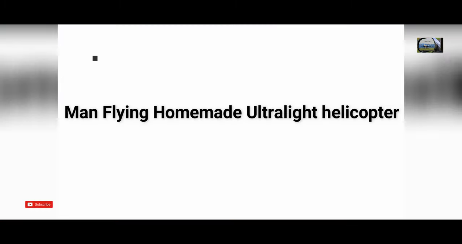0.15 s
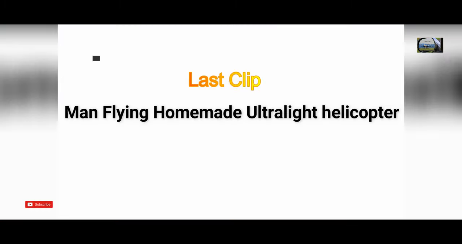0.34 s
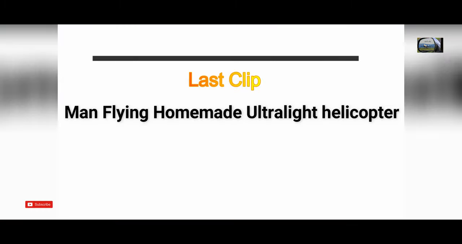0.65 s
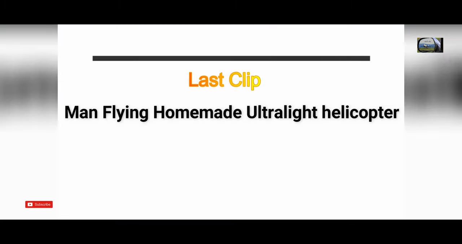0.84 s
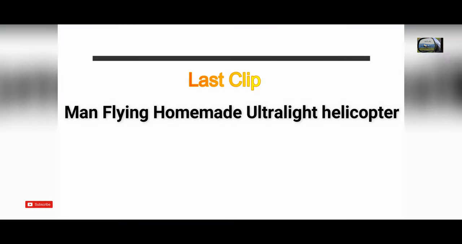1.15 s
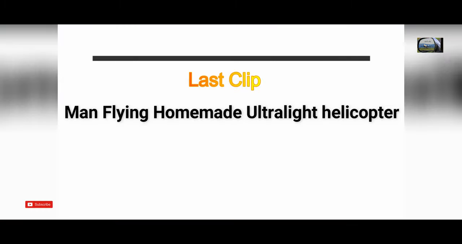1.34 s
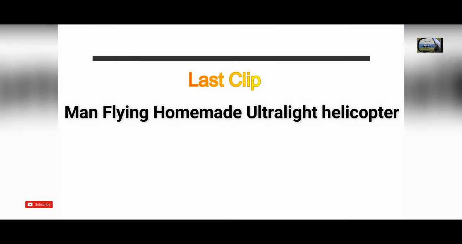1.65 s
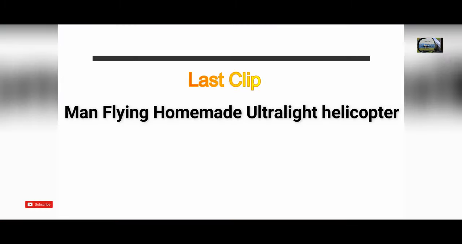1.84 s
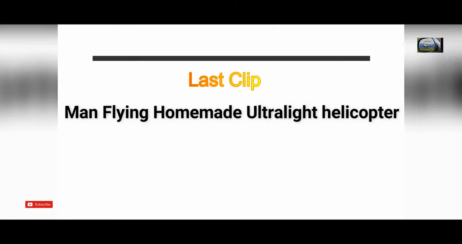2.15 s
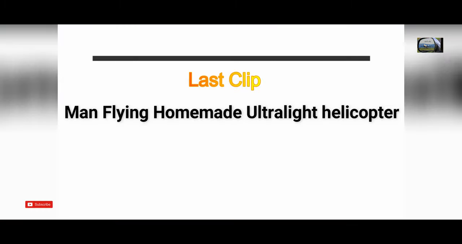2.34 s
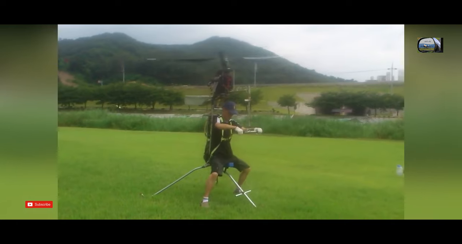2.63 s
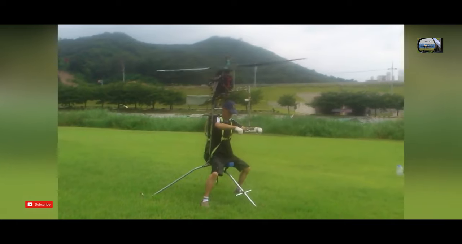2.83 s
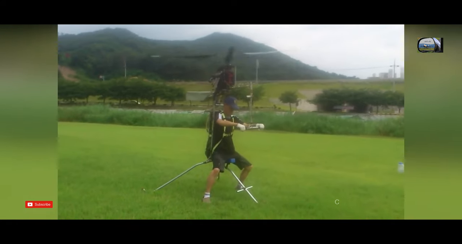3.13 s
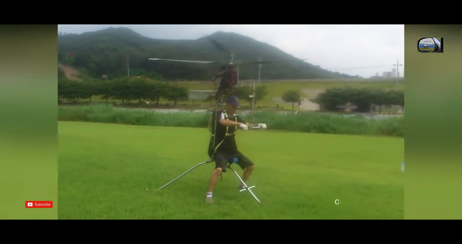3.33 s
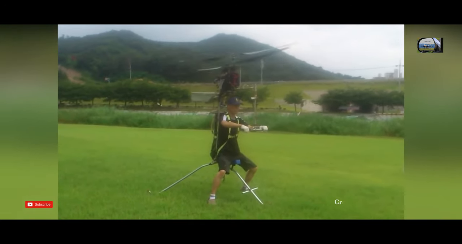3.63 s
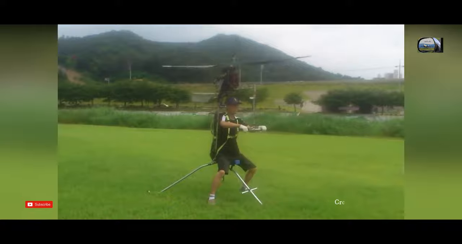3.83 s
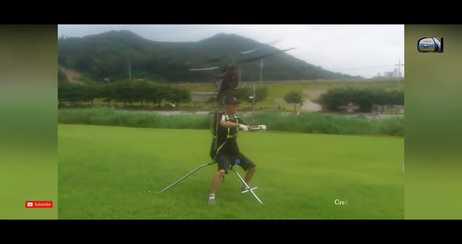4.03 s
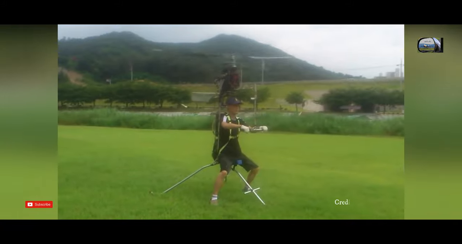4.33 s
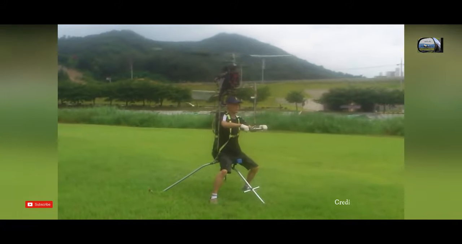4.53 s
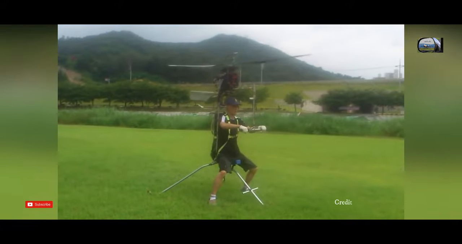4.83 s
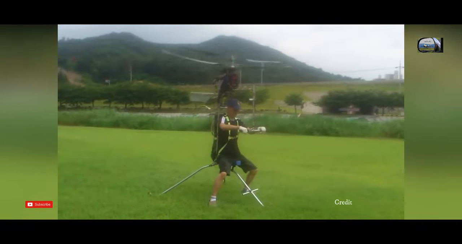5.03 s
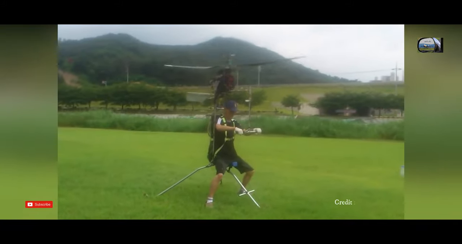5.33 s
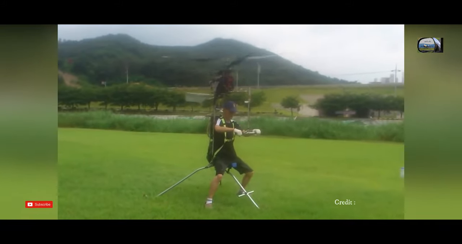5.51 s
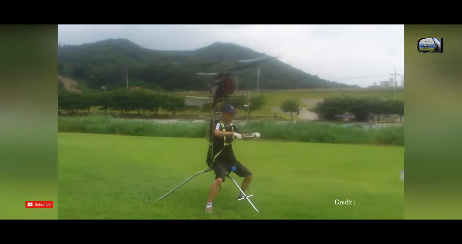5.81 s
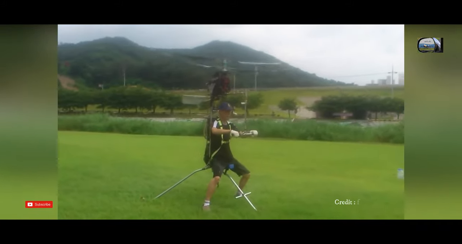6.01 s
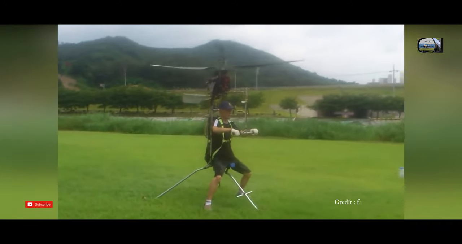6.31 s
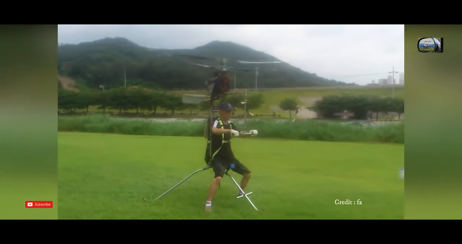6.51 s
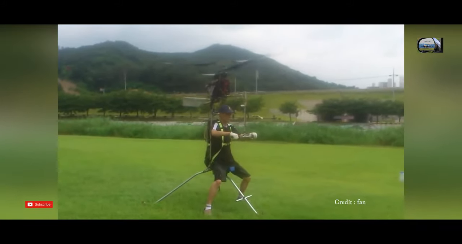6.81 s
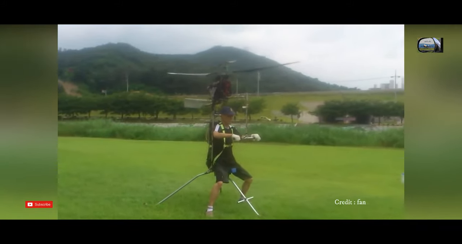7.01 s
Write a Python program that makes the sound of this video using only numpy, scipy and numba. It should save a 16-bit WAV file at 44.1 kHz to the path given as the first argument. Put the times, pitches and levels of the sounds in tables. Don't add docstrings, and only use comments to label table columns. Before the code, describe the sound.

Silence lasts about 0.17 seconds, then a small two-cylinder two-stroke engine enters abruptly. Until about 3.2 it idles at a loping, irregular pace: paired pops roughly seven times a second from each cylinder, weak misfires between, dry crackling gas and hollow, metallic exhaust ringing. From 3.2 to 3.5 the pops crowd together and it catches with a small thump. It then fires in a nearly even, raspy buzz at about 85 beats per second, with slight stumbles until 4.9, climbing gradually to about 120 by 7.1. Fan and blade hiss rises quickly after 3.2, then slowly thickens. Rotor wash adds low fluttering rumble, with stronger gusts and blunt microphone thumps near 6.3-6.4 and a fainter one at 6.65. Close, outdoor phone stereo; short dull grass echo, right-side treble shaded, image drifting from slightly left to centre.

```python
import sys
import numpy as np
from scipy import signal
from scipy.fft import rfft, irfft
from scipy.io import wavfile
from scipy.ndimage import uniform_filter1d, map_coordinates
from numba import njit

SR = 44100
rng = np.random.default_rng(int(sys.argv[2]) if len(sys.argv) > 2 else 0)


def persist_wave(psi):
    counts = np.round(np.clip(psi, -1, 1) * 32767).astype(np.int16)
    wavfile.write(sys.argv[1], SR, np.atleast_2d(counts).T)


def nominal_scale(level):
    x = np.asarray(level, float) / 20
    return 10 ** x


N = 315756
T = np.arange(N) / SR
F = np.maximum(np.arange(N // 2 + 1) * SR / N, 1)

# (time [s], speed [Hz])
IDLE_SHAFT = [(0, 35.1), (3.2, 35.3), (3.45, 42)]
# (time [s], speed [Hz])
POWER_SHAFT = [(3.45, 42.2), (3.53, 45.09), (3.575, 44.38), (3.655, 46.69), (3.835, 48.55), (3.875, 47.99),
               (4.085, 48.71), (4.275, 48.62), (4.39, 49.41), (4.855, 51.48), (5.155, 52.41),
               (5.245, 51.95), (5.38, 53.53), (5.865, 55.51), (6.03, 56.41), (6.445, 58.14), (6.675, 59.34),
               (7.16, 60.34)]
# (time [s], blow [dB], blow one turn earlier [dB], gas crack [dB])
LOPES_CRISP = [(0.25, -16, -16, -38), (0.391, -15.5, -19.5, -22), (0.535, -16, -15.5, -25),
               (.676, -14.5, -20, -22), (.791, -18, -27, -33), (0.876, -19.5, -20, -36),
               (.989, -16.5, -23, -25.5), (1.13, -18, -14.5, -37), (1.274, -16.5, -17, -28),
               (1.417, -14.5, -19, -21.5), (1.59, -18, -15, -27), (1.731, -15, -17.5, -28),
               (1.875, -15, -17.5, -25), (2.019, -18, -16.5, -39), (2.16, -16.5, -26, -32),
               (2.246, -16, -27, -24), (2.389, -15.5, -21, -39), (2.53, -14.5, -17.5, -26),
               (2.674, -15, -19.5, -21.5), (2.817, -14.5, -19, -28), (2.959, -13.5, -19.5, -20.5),
               (3.128, -17, -15.5, -32), (3.27, -15.5, -13, -22), (3.348, -11.5, -26, -24),
               (3.400, -14, -16, -46), (3.449, -11.5, -16, -32), (3.496, -13.5, -12.5, -29)]
# (time [s], blow [dB], blow one turn earlier [dB], gas crack [dB])
LOPES_ROUGH = [(0.234, -14, -22, -21), (.348, -15.5, -24, -23.5), (0.49, -23, -17.5, -25),
               (0.635, -24, -17, -48), (0.772, -19, -21, -24), (0.888, -17.5, -22.5, -26),
               (1.029, -16, -18.5, -23), (1.173, -15.5, -20, -26.5), (1.317, -19, -19, -26),
               (1.455, -17, -16, -26.5), (1.599, -16, -25, -26), (1.688, -17, -26, -23),
               (1.832, -18, -21.5, -23), (1.972, -18, -18, -23), (2.1165, -14, -18, -20.5),
               (2.23, -20, -28, -22.5), (2.259, -16, -22, -23), (2.373, -15, -25, -26),
               (2.403, -18, -21, -26), (2.513, -22, -27, -21.5), (2.544, -14.5, -40, -27),
               (2.688, -14, -20, -29), (2.802, -18, -23.5, -21), (2.915, -16.5, -17.5, -24.5),
               (3.056, -14.5, -20.5, -20), (3.17, -17, -30, -29), (3.198, -16, -23, -24),
               (3.333, -21, -14, -22), (3.411, -12, -45, -23), (3.434, -16, -11, -32),
               (3.483, -13, -44, -24)]
# (time [s], blow [dB])
STRAYS = [(.278, -19), (.705, -21), (.819, -23), (.931, -21.5), (1.187, -29), (1.529, -25), (1.82, -27),
          (1.962, -22), (2.047, -27), (2.075, -22), (2.104, -23), (2.303, -37), (2.331, -20.5),
          (2.416, -23), (2.473, -25), (3.073, -22)]
# (time [s], loss [dB])
STUMBLES = [
    (3.575, 20),
    (3.824, 5),
    (3.998, 3),
    (4.018, 4),
    (4.11, 6),
    (4.4, 4),
    (4.79, 5),
    (4.897, 4),
]

# (frequency [Hz], width [Hz], level [dB], signed gain [1])
PIPE_CRISP = [(390, 34, -38, -1.8), (550.4, 85, 0, -1.1), (936, 656, 9.5, -0.88), (1302, 214, 10, 0.38)]
# (frequency [Hz], width [Hz], level [dB], signed gain [1])
PIPE_CRISP_TAIL = [(560.3, 47, -9, -0.7), (357, 21, -17.5, -1)]
# (frequency [Hz], width [Hz], level [dB], signed gain [1])
PIPE_ROUGH = [(287, 195, 3.5, -0.59), (603.6, 131, -2.5, -1.7), (1108, 48, -1.5, -0.38),
              (1642, 280, 7.5, 0.23)]
# (frequency [Hz], width [Hz], level [dB], signed gain [1])
PIPE_ROUGH_COLD = [(325, 43, 4.5, -0.39), (624, 75, -21, -0.35), (1100, 85, 4.5, -0.51),
                   (1568, 146, 7.5, 0.47)]
# (frequency [Hz], width [Hz], level [dB], signed gain [1])
SILENCER = [(161, 71.6, -5.5, -1.17), (199, 230, -6, 0.92)]
# (frequency [Hz], width [Hz], level [dB], signed gain [1])
TAILPIPE = [(1678, 40, -13.5, -0.44), (2170, 650, -34, -0.75), (202.5, 34.7, -10.5, 1)]
# (frequency [Hz], width [Hz], level [dB], signed gain [1])
FRAME = [(106.2, 17, -0.5, -0.43), (339.7, 3.1, -12, 0.38), (263, 103, 6.5, 0.57)]
# (frequency [Hz], width [Hz], level [dB], signed gain [1])
HEADER = [(547.3, 24.5, 0, -1), (365.4, 13.7, -7.5, 1), (703, 26, -3, 0.73), (1176, 77, -7.5, -0.83),
          (1617, 38, -4.5, 0.93)]
# (frequency [Hz], width [Hz], level [dB], signed gain [1])
STUB = [(1535, 42, -6.5, 0.66), (1896, 90, 2, -0.97)]
# (frequency [Hz], width [Hz], share [1])
THINNED_BANDS = [(350, 260, 0.57), (1410, 86, 0.27)]
# (frequency [Hz], width [Hz], share [1])
NOTCH = (810, 30, 1)
# (frequency [Hz], width [Hz], level [dB])
OUTLET = [(2005, 444, -0.5), (2593, 280, -6.5), (3660, 550, -3.5), (4320, 2000, -15), (7600, 3700, -7.5),
          (9960, 1670, 5), (13100, 1500, -15)]
# (frequency [Hz], width [Hz], level [dB])
SHIELD = (2700, 200, 10)

# (frequency [Hz], density [dB per Hz])
AIR_HISS = [(100, -30), (250, -15), (1300, -11),
            (1700, -15), (2200, -11.5), (3100, -12), (3900, -17.5), (4900, -15.5), (5800, -15), (7900, -17),
        (10300, -12), (14900, -23.5), (16000, -15)]
# (time [s], change [dB], length [s])
SWELLS = [
    (5.444, 0.3, 0.19),
    (6.624, -1.1, 0.18),
]
# (time [s], level [dB], length [s])
GUSTS = [
    (4.598, -56, 0.11),
    (4.8, -53, 0.058),
    (5.152, -60, 0.074),
    (5.452, -50, 0.091),
    (6.325, -33, 0.03),
    (6.57, -42, 0.043),
    (6.67, -40, .04),
    (6.75, -45, .03),
    (7.001, -52, 0.079),
]
# (time [s], peak [dB], frequency [Hz], length [s])
THUMPS = [
    (3.58, -32, 127, 0.021),
    (6.313, -30, 230, 0.0074),
    (6.34, -39, 330, .01),
    (6.3758, -25.5, 111, 0.021),
    (6.65, -41, 150, 0.025),
]
# (frequency [Hz], correlation [1])
LIKENESS = [(100, 1), (1500, 0.91), (2900, 0.28), (4300, 0.95), (6000, 0.57), (9000, 0.23), (16000, .45)]
# (time [s], left minus right [dB])
PAN = [(0, 1.7), (3, 1.6), (5, .7), (7.16, -.2)]
# (frequency [Hz], gain [dB])
RIGHT_PORT = [(100, 0.5), (1200, 0.3), (2800, -5), (4500, -2.5), (7000, 3.5), (9500, -13), (11000, -28),
              (13000, -7), (16000, -25.5)]

CATCH_S, THROTTLE_S = 3.5, 3.21
PUMP_DB, PUMP_ROUGH_DB = -36, 10
LIT_DB = -28
SURGE_S, LURCH_S = .002, .0004
BLOW_DB, BLOW_SAG_DB_PER_S, GAS_DB, GAS_SAG_DB_PER_S = -11.5, -0.34, -7.5, 0.3
BOOM_FLOOR_DB = -16
IDLE_ROUGH_DB = -6
LATE_S = 0.00018
TAIL_GONE_S, TAIL_FADE_DB_PER_S = 3.33, 40
ROUGH_WARM_DB, ROUGH_WARM_S = 0, 0.083
HEADER_DB, HEADER_PUSH_S, HEADER_FADE_DB_PER_S = -23, 0.00215, 27
SWEPT_DB, BURNT_DB = 1.5, 1.5
STUB_DB, STUB_DROP_DB, STUB_FROM_S = -17.5, 6, 3.3
BARK_DB, BARK_HOLD_S, BARK_DROP_DB, BARK_FADE_S = -34.5, .7, 7, .5
FIRST_CRACK_DB = -11
CRACK_BODY_DB, CRACK_BODY_SHARE, ROUGH_BODY_DB = -39, 0.15, 1
SNAP_HZ, SNAP_DB, SNAP_RISE_S, SNAP_FALL_S = 13500, 10, .0008, .0016
SPIT_TOP_HZ, GAS_BLUR_S = 10000, 2.7
FAN_IDLE_DB, FAN_RISE_DB, SPIN_UP_S, FAN_DB_PER_S, FAN_FULL_S = -37.5, 11, 0.43, 1.37, 6.3
BUFFET_DB, WASH_DB, WASH_DB_PER_S, WASH_FULL_S, WASH_PATCHY_DB = -48, -56, 5.5, 6.3, 1.5
GROUND_S, GROUND_GAIN = 0.00183, 0.82
GROUND_SHRINK = 0.087
BODY_GROUND_S, BODY_TOP_HZ = 0.001907, 1050
START_S, FADE_S, TOP_HZ = 0.1726, 0.019, 15550


def unit(x):
    return x / np.sqrt(np.mean(x ** 2))


def on_log(table, hz):
    table_hz, value = np.transpose(table)
    return np.interp(np.log(hz), np.log(table_hz), value)


def train(times, sizes):
    at, out = np.asarray(times) * SR, np.zeros(N + 2)
    k = np.clip(at.astype(int), 0, N)
    np.add.at(out, k, sizes * (1 - at % 1))
    np.add.at(out, k + 1, sizes * (at % 1))
    return out[:N]


@njit
def ring(x, hz, width):
    y, z = np.empty(len(x)), 0j
    for i in range(len(x)):
        z = z * np.exp((2j * hz[i] - width) * np.pi / SR) + x[i]
        y[i] = z.imag
    return y


def band(x, hz, width):
    return signal.lfilter(*signal.iirpeak(hz, hz / width, fs=SR), x)


def butter(x, order, hz, kind="lowpass"):
    return signal.sosfilt(signal.butter(order, hz, kind, fs=SR, output="sos"), x)


def puff(x, rise_s, fall_s):
    a, b = np.exp(-1 / (rise_s * SR)), np.exp(-1 / (fall_s * SR))
    return signal.lfilter([1 - a], [1, -a], signal.lfilter([1], [1, -b], x))


def bump(s, length_s):
    return np.exp(-((T - s) / length_s) ** 2)


def pair():
    c = np.clip(on_log(LIKENESS, F), 0, 1)
    one, other = rfft(rng.standard_normal((2, N)))
    return irfft(np.array([one, c * one + np.sqrt(1 - c ** 2) * other]), N)


def walk(rate_hz):
    k = int(SR / rate_hz)
    held = np.repeat(rng.standard_normal(N // k + 1), k)
    return 1.5 * uniform_filter1d(uniform_filter1d(held, k), k)[:N]


def strokes():
    crisp, rough = np.transpose(LOPES_CRISP), np.transpose(LOPES_ROUGH)
    s = crisp[0]
    gaps = 2 * np.round(np.diff(s) * np.interp(s[1:], *np.transpose(IDLE_SHAFT)))
    turn = np.append(0, np.cumsum(gaps)) + 7
    every = np.arange(turn[-1] + 1)
    first_s = s[0] - turn[0] / (2 * IDLE_SHAFT[0][1])
    idle = np.interp(every, np.append(0, turn), np.append(first_s, s))
    through = np.interp(every, turn, np.arange(len(s))) % 1
    idle = idle - SURGE_S * np.sin(np.pi * through) - LURCH_S * np.sin(2 * np.pi * through)

    chance = rng.standard_normal((2000, 3))
    idle_db = PUMP_DB + PUMP_ROUGH_DB * (every % 2 == 0) + 1.1 * chance[:len(every), 0]
    rough_turn = 2 * np.round(np.interp(rough[0], idle, every) / 2)
    for lope, at in (crisp, turn), (rough, rough_turn):
        idle_db[at.astype(int) - 2] = lope[2]
        idle_db[at.astype(int)] = lope[1]
    for at, db in STRAYS:
        idle_db[np.argmin(np.abs(idle - at) + (every % 2 == 0))] = db

    phase = np.cumsum(2 * np.interp(T, *np.transpose(POWER_SHAFT)) / SR * (T > s[-1]))
    more = np.arange(1, int(phase[-1]))
    luck = chance[len(every):len(every) + len(more)].T
    run = np.interp(more + .002 * luck[0], phase, T)
    settle_db = .35 + .8 * np.exp(-(run - s[-1]) / .12)
    run_blow_db = BLOW_DB - BLOW_SAG_DB_PER_S * (run - CATCH_S) + settle_db * luck[1]
    run_gas_db = GAS_DB - GAS_SAG_DB_PER_S * (run - CATCH_S) + 1.7 * luck[2]

    times = np.append(idle, run)
    odd = np.append(every, turn[-1] + more) % 2 == 1
    blow_db, gas_db = np.append(idle_db, run_blow_db), np.append(idle_db + 1, run_gas_db)
    for at, loss_db in STUMBLES:
        k = np.argmin(np.abs(times - at) + odd)
        blow_db[k] -= loss_db
        gas_db[k] -= loss_db
    return times, odd, blow_db, gas_db


def cracks():
    s, _, first_db, db = np.transpose(LOPES_CRISP + LOPES_ROUGH)
    rough = np.tile(np.arange(len(s)) >= len(LOPES_CRISP), 2)
    s = np.append(s, s - 1 / np.interp(s, *np.transpose(IDLE_SHAFT)))
    db = np.append(db, first_db + FIRST_CRACK_DB)
    return s, db, CRACK_BODY_SHARE * (CRACK_BODY_DB - db) + ROUGH_BODY_DB * rough


def bark_fading(times):
    return 1 - np.exp(-np.maximum(times - CATCH_S - BARK_HOLD_S, 0) / BARK_FADE_S)


def header_pump(times, blow_db, cold):
    pumped = times[cold] - HEADER_PUSH_S
    loss_db = SWEPT_DB * (np.roll(blow_db, 1) > LIT_DB)[cold] + BURNT_DB * (blow_db[cold] > LIT_DB)
    loss_db = loss_db + HEADER_FADE_DB_PER_S * np.maximum(pumped - THROTTLE_S, 0)
    return pumped, HEADER_DB - loss_db + 1.5 * rng.standard_normal(len(pumped))


def exhaust_tone(times, odd, blow_db):
    idling = times < CATCH_S
    hot, cold = ~odd & ~idling, ~odd & idling
    waking = cold & (times > STUB_FROM_S)
    late, crisp_s = times[hot], times[odd] + LATE_S
    boom_db = np.maximum(blow_db - 5 * idling, BOOM_FLOOR_DB)
    warm_db = blow_db[hot] - ROUGH_WARM_DB * np.exp(-(late - CATCH_S) / ROUGH_WARM_S)
    tail_db = blow_db - TAIL_FADE_DB_PER_S * np.maximum(times - TAIL_GONE_S, 0)
    stub_db = STUB_DB + blow_db - BLOW_DB
    # (modes, blow times, blow dB, roughness dB)
    parts = [
        (SILENCER, times, boom_db, -37),
        (TAILPIPE, times, blow_db, -35),
        (PIPE_ROUGH, late, warm_db, -32),
        (PIPE_ROUGH_COLD, times[cold], blow_db[cold], -30),
        (PIPE_CRISP, crisp_s, blow_db[odd], -37),
        (FRAME, times[idling], blow_db[idling], -36),
        (HEADER, *header_pump(times, blow_db, cold), -33),
        (PIPE_CRISP_TAIL, crisp_s, tail_db[odd], -40),
        (STUB, times[waking], stub_db[waking] - 1, -28),
        (STUB, late, stub_db[hot] - STUB_DROP_DB * bark_fading(late), -30)]

    warmth = np.interp(T, [3.2, 3.9, 5.9, 7.16], [.955, .985, 1.02, 1.03])
    ragged = np.interp(T, [3.4, 3.7], [1, .12])
    tone = 0
    for modes, at, size_db, rough_db in parts:
        blows = train(at, nominal_scale(size_db))
        grain = puff(blows, 0.0037, 0.018) * rng.standard_normal(N)
        blows = blows + ragged * nominal_scale(rough_db + IDLE_ROUGH_DB) * grain
        for hz, width, db, sign in modes:
            tone = tone + sign * nominal_scale(db) * ring(blows, hz * warmth, 1. * width)
    for hz, width, share in THINNED_BANDS:
        tone = tone - share * np.clip((T - CATCH_S) / 3.3, 0, 1) * band(tone, hz, width)
    notch_hz, notch_width, notch_share = NOTCH
    return tone - notch_share * np.clip((T - CATCH_S) / 0.67, 0, 1) * band(tone, notch_hz, notch_width)


def bark(times, odd, blow_db, noise):
    s, db, low_db = cracks()
    hot = ~odd & (times >= CATCH_S)
    rasp_db = BARK_DB + blow_db[hot] - BLOW_DB - BARK_DROP_DB * bark_fading(times[hot])
    burst = puff(train(s, nominal_scale(db + low_db + 0.5)), 0.00098, 0.0072) * noise
    rasp = puff(train(times[hot], nominal_scale(rasp_db)), 0.00059, 0.0027) * noise
    low = nominal_scale(19.0) * band(burst, 727, 350)
    middle = nominal_scale(18.5) * band(burst + rasp, 1290, 290)
    return low + middle + nominal_scale(-2) * band(burst + nominal_scale(36.5) * rasp, 1544, 180)


def outlet_gas(times, odd, gas_db, noise):
    spit = puff(train(times, nominal_scale(gas_db - 2.7 * odd)), .001, .0022) * noise
    blur = 0.26 * np.clip((T - 4.2) / GAS_BLUR_S, 0, 1)
    even = np.sqrt(uniform_filter1d(spit ** 2, size=2000)) * noise
    spit = np.sqrt(1 - blur) * spit + np.sqrt(blur) * even * 0.54
    spit = butter(spit, 2, SPIT_TOP_HZ)

    s, db, _ = cracks()
    gust = spit + puff(train(s, nominal_scale(db + 5.5)), 0.0024, 0.0045) * noise
    gas = 0
    for hz, width, level_db in OUTLET:
        gas = gas + nominal_scale(level_db) * np.sqrt(SR / 8 / width) * band(gust, hz, width)
    gas = butter(gas, 2, 1500, "highpass")

    shield_hz, shield_width, shield_db = SHIELD
    struck = puff(train(s, nominal_scale(db)), 0.00066, 0.014) * noise
    snap = puff(train(s, nominal_scale(db + SNAP_DB)), SNAP_RISE_S, SNAP_FALL_S) * noise
    gas = gas + nominal_scale(shield_db) * band(struck, shield_hz, shield_width) + band(snap, SNAP_HZ, 4500)
    return nominal_scale(-3.5) * gas


def engine():
    times, odd, blow_db, gas_db = strokes()
    tone = exhaust_tone(times, odd, blow_db)
    noise = pair()
    return tone + bark(times, odd, blow_db, noise), outlet_gas(times, odd, gas_db, noise)


def air():
    noise, swell, out = pair(), walk(3.57), 0
    flicker_db = .8 + .8 * (T < THROTTLE_S)
    for hz in 250 * 2 ** np.arange(0, 6.1, .5):
        out = out + nominal_scale(.3 * swell + flicker_db * walk(15)) * band(noise, hz, hz / 2)
    white = rfft(out) * nominal_scale(on_log(AIR_HISS, F))
    treble = irfft(white * (F > 5000) * (F < 12000), N)
    open_s = np.maximum(T - THROTTLE_S, 0)
    db = FAN_IDLE_DB + FAN_RISE_DB * (1 - np.exp(-open_s / SPIN_UP_S))
    db = db + FAN_DB_PER_S * np.minimum(open_s, FAN_FULL_S - THROTTLE_S)
    for s, up_db, length_s in SWELLS:
        db = db + up_db * bump(s, length_s)
    return irfft(white, N) / np.std(treble[0]) * nominal_scale(db)


def wash():
    push = rng.standard_normal((3, N))
    push = push[:2] + .7 * push[2]
    flutter = nominal_scale(-0.5) * unit(band(push, 222, 92)) * np.clip(T - THROTTLE_S, .2, 1)
    low = unit(band(push, 28, 26)) + flutter
    force = nominal_scale(BUFFET_DB) * np.clip((CATCH_S - T) / 0.35, 0, 1)
    force = force + nominal_scale(WASH_DB + WASH_DB_PER_S * (np.minimum(T, WASH_FULL_S) - CATCH_S))
    force = force * nominal_scale(WASH_PATCHY_DB * walk(2.9))
    for s, db, length_s in GUSTS:
        force = force + nominal_scale(db) * bump(s, length_s)
    out = low * force * nominal_scale(-2.5 + 0.23 * walk(6.4))
    for s, db, hz, length_s in THUMPS:
        out = out + nominal_scale(db) * bump(s, length_s) * np.sin(2 * np.pi * hz * (T - s))
    return out


def ground(x, gain):
    soft = np.atleast_2d(signal.lfilter(*signal.butter(1, 4000, fs=SR), x))
    powered = np.clip((T - CATCH_S) / (T[-1] - CATCH_S), 0, 1)
    lag_s = GROUND_S * (1 - GROUND_SHRINK * powered)
    bass = rfft(soft) / (1 + (F / BODY_TOP_HZ) ** 8)
    body = irfft(bass * np.exp(-2j * np.pi * F * BODY_GROUND_S), N)
    rest = soft - irfft(bass, N)
    moving = np.array([map_coordinates(v, [(T - lag_s) * SR], order=3) for v in rest])
    return x + gain * (body + moving)


def scene():
    tone, gas = engine()
    tone = butter(tone, 3, 75, "highpass")
    pan_db = np.interp(T, *np.transpose(PAN))
    heard = ground(tone, GROUND_GAIN) + ground(gas + air(), .3)
    return heard * nominal_scale(np.array([pan_db, -pan_db]) / 2 - 7) + wash()


def roll_off(x):
    return signal.sosfilt(signal.butter(12, 16430, fs=SR, output="sos"), x)


def record(dry):
    grid_hz = np.maximum(np.arange(513) * SR / 1024, 1)
    cep = irfft(on_log(RIGHT_PORT, grid_hz) * np.log(10) / 20)
    cep[1:512], cep[513:] = 2 * cep[1:512], 0
    shade = irfft(np.exp(rfft(cep)))[:512]
    ports = np.array([dry[0], signal.fftconvolve(dry[1], shade)[:N]])
    ports = butter(ports, 2, 45, "highpass")
    held = np.tanh(3.8 * ports) / 3.3
    held = held * np.clip((T - START_S) / FADE_S, 0, 1)
    cut = signal.sosfilt(signal.ellip(10, .2, 80, TOP_HZ, fs=SR, output="sos"), held)
    return roll_off(cut)


dry = scene()
out = record(dry)
persist_wave(out)
```